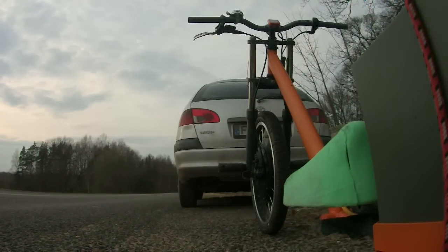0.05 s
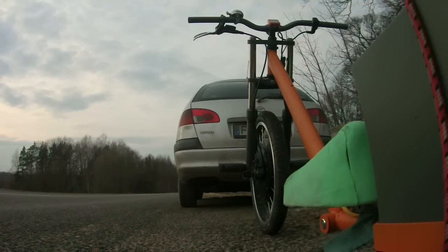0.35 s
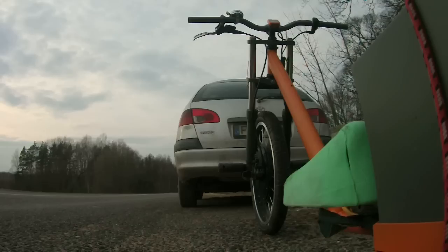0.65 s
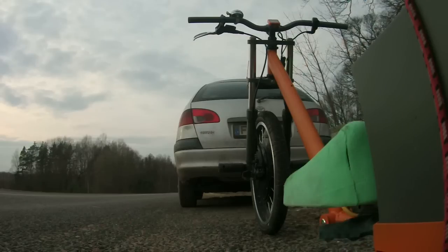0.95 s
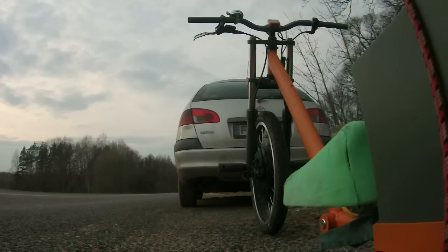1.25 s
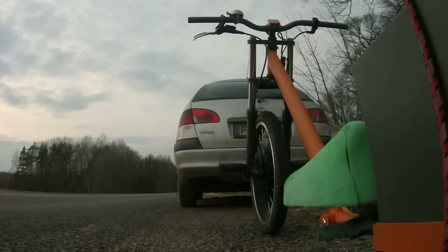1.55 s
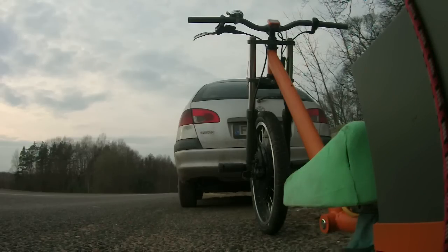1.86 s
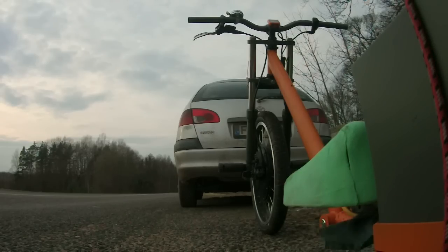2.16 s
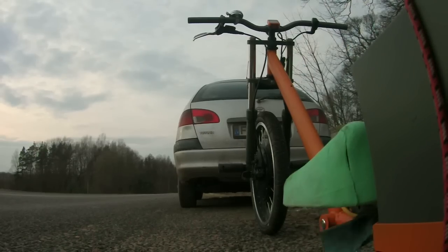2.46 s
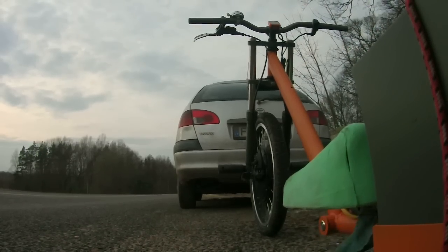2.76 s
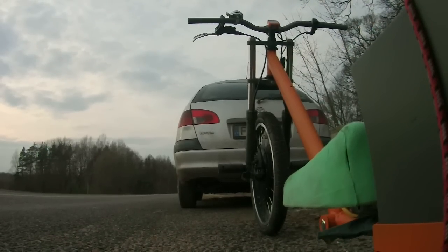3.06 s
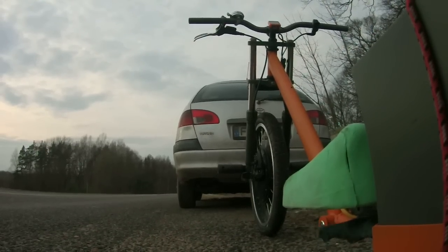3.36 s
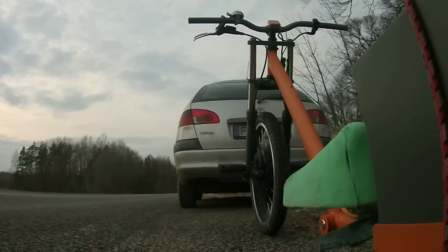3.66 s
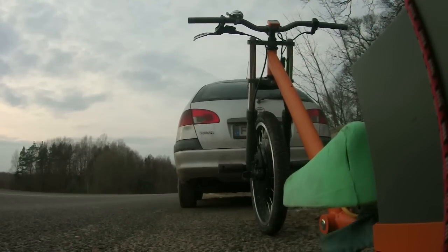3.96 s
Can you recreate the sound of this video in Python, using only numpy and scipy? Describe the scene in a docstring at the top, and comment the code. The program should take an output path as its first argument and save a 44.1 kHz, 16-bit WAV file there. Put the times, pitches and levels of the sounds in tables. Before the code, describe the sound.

A parked bicycle knocks and clatters as it is handled close by outdoors. For two seconds there is only a faint rumble, a low wavering hum and a few soft bumps. Two hollow knocks shake the frame at about 2.1 and 2.3 seconds. Small parts click and rub, and a sharp snap rings briefly near 2.9. More clicks and thumps follow, ending in a dull clunk around 3.7.

```python
"""On an open road, a parked bicycle rig is handled close by.
Two hollow knocks, each a cluster of quick blows, shake its frame. Small hard parts click and clatter
as they meet, and one sharp snap leaves a metal piece ringing. In between, soft bumps sway the rig
and shifting parts rub. Behind it all lie a low rumble, a wavering hum and faint distant noise."""
import sys
import numpy as np
from scipy import signal
from scipy.fft import rfft, irfft
from scipy.io import wavfile
from scipy.ndimage import uniform_filter1d

SR = 44100
rng = np.random.default_rng(int(sys.argv[2]) if len(sys.argv) > 2 else 0)


def to_wav(s):
    """Save 16-bit WAV."""
    ch = np.atleast_2d(s).T  # columns
    pcm = np.round(np.clip(ch, -1, 1) * 32767)  # PCM
    wavfile.write(sys.argv[1], SR, pcm.astype(np.int16))


N = 176400
T = np.arange(N) / SR

# Levels compare the rows of one table. A "colour" says how strong the low and high pitches are.
# colours of the steady hiss, the dull shuffling wash and the rumble: (pitch [Hz], level [dB])
HISS_COLOUR = [(90, 1.5), (290, -4.5), (480, -9.5), (700, -18), (1200, -12.5), (2000, -21.5), (3500, -27.5),
               (8000, -24.5), (10000, -27.5), (15000, -30)]
DULL_COLOUR = [(120, 1), (290, -8), (500, -9), (650, -19), (900, -20), (1200, -9), (1700, -17), (2300, -28),
               (5000, -44)]
DEEP_COLOUR = [(20, 2), (45, -10.5), (57, 1.5), (75, -15), (200, -39)]
# how the wash, the rumble and the hum rise and fall: (time [s], level [dB])
WASH_LEVELS = [(0, -63.5), (.3, -77), (.55, -61.5), (.72, -79), (.87, -67), (1.0, -57.5), (1.15, -61.5),
               (1.4, -58.5), (2.0, -62), (4, -79.5)]
RUMBLE_LEVELS = [(0, -47), (.72, -51.5), (1.05, -44), (2.02, -43), (2.6, -36), (3.7, -37), (3.85, -46.5)]
HUM_LEVELS = [(0, -53.5), (.55, -45), (.66, -60), (.95, -52.5), (1.1, -43), (1.9, -45), (2.02, -68)]

# rubbing as the parts are shifted: (time [s], level [dB])
RUB_LEVELS = [(2.19, -62), (2.27, -39), (2.36, -42), (2.38, -54), (2.41, -39.5), (2.45, -62), (2.49, -42.5),
              (2.52, -51.5), (2.63, -45.5), (2.72, -57.5), (2.85, -58), (2.93, -39.5), (2.97, -50.5),
              (3.045, -65.5), (3.075, -56.5), (3.23, -47.5), (3.295, -56.5), (3.39, -47.5), (3.44, -61),
              (3.53, -75.5), (3.65, -41), (3.70, -42.5), (3.735, -61.5), (4, -78.5)]
# hissing scuffs and gritty scrapes: (peak time [s], level [dB], half-width [s])
SCUFF_SWELLS = [(2.404, -52, 0.0096), (2.629, -54, 0.0098), (2.907, -33, 0.002), (3.33, -57.5, 0.0039),
                (3.404, -47.5, 0.0055), (3.654, -31.5, 0.0022)]
SCRAPE_SWELLS = [(.865, -61, 0.018), (1.42, -66, 0.012), (1.53, -63.5, 0.017), (1.70, -54.5, 0.013)]
# colours of the rubbing and the scuffs: (pitch [Hz], level [dB])
RUBBING_COLOUR = [(150, 5.5), (350, 0), (500, 1.5), (620, -9), (880, -10), (1200, -1), (2100, -6.5),
                  (2850, -19.5), (3800, -17), (5500, -30.5), (7400, -23), (9000, -30.5), (14000, -39)]
BRIGHT_COLOUR = [(1000, 1.5), (3500, 6.5), (11000, -6), (15000, -19.5)]
# soft bumps that sway the rig: (time [s], level [dB], pitch [Hz], ring time [s], rise time [s])
SOFT_BUMPS = [(0.979, -41.5, 149.5, 0.11, 0.0043), (0.997, -26.5, 33.3, 0.27, 0.004),
              (1.331, -29.5, 50, 0.12, 0.0032), (2.066, -38, 280, 0.068, 0.001),
              (2.093, -16.5, 272, 0.038, 0.0026), (2.108, -17, 52.8, 0.41, 0.0013),
              (2.266, -13.5, 62.3, 0.3, 0.0024), (2.477, -26, 255, 0.02, 0.0021),
              (2.477, -24.5, 255, 0.02, 0.0014), (2.6453, -13, 41.7, 0.1, 0.00057),
              (2.683, -9.5, 129, 0.032, 0.0011), (3.378, -17, 51.1, 0.13, 0.00092),
              (3.4082, -3, 44.2, 0.04, 0.0013), (3.41, -12, 164, 0.013, 0.0011),
              (3.637, -10.5, 23.3, 0.17, 0.0085), (3.671, -14.5, 239, 0.015, 0.00045),
              (3.698, -9.5, 44, 0.2, 0.0019)]

# small parts meeting: (time [s], level [dB], contact fade [s], thud [dB], brightness [dB])
PART_CLICKS = [(0.7068, -55.5, 0.0004, -7, 2), (2.296, -36, 0.0063, -12, -13.5),
               (2.572, -38, 0.0029, -20, -22), (2.616, -36, .0013, 2.5, -3), (2.6395, -25, 0.002, -4, -3),
               (2.6448, -21, 0.00084, -12, -19), (2.6513, -30.5, 0.0026, 5, -7),
               (2.683, -17.5, 0.0015, 0, -14.5), (2.847, -30.5, 0.0026, -10, -16),
               (2.8916, -37, 0.0048, 1.5, -8), (2.9079, -31, 0.0041, -32, -15),
               (2.938, -25.5, 0.0035, 2.5, -9.5), (3.323, -36.5, 0.00091, -11, -32),
               (3.3775, -22.5, 0.0011, -6.5, -20.5), (3.382, -30.5, 0.0019, -3, -23),
               (3.4049, -22, 0.0011, 0.5, -11), (3.515, -51.5, 0.00087, -22, -33),
               (3.643, -39.5, 0.0025, 1, -2), (3.655, -21, 0.00025, -20, -11),
               (3.673, -18.5, 0.0033, -5, -9.5), (3.680, -24, 0.0026, -1.5, -18.5)]
# knocks on the frame: (time [s], level [dB], contact fade [s], boom [dB], treble limit [Hz])
FRAME_KNOCKS = [(1.003, -53, 0.0045, -8, 4050), (1.036, -53.5, 0.0051, 5, 5500),
                (2.021, -50, 0.0029, 1.5, 1270), (2.0873, -33.5, 0.0066, -18, 4260),
                (2.0928, -12.5, 0.00049, -17, 3260), (2.099, -27, 0.02, 2.5, 2640),
                (2.186, -44.5, 0.0023, -4, 3970), (2.223, -29.5, 0.0015, -3, 3540),
                (2.2387, -27.5, 0.00082, 3, 2680), (2.2502, -9, 0.0055, -0.5, 4500),
                (2.255, -13.5, 0.00067, -1.5, 4570), (2.261, -35.5, 0.0029, 19, 7000),
                (2.4764, -29.5, 0.0031, -18, 5950), (2.987, -42, 0.003, -11, 1700)]
# clean, hard blows: (time [s], level [dB])
CLUNK_BLOWS = [(3.6992, -25.5)]  # a part settles into its seat
SNAP_BLOWS = [(2.9462, 4.5), (2.9473, -3.5)]  # the snap and its quick rebound
METAL_BLOWS = [(2.9465, -35.5), (3.673, -43)]  # these reach the metal piece
TAIL_BLOWS = [(2.0926, -26), (2.2502, -42.5)]  # these leave the frame ringing on

# A "mode" is a tone that a struck thing rings with. It fades by 60 dB in its ring time.
# modes of each thing: (pitch [Hz], level [dB], ring time [s])
PART_MODES = [(840, -8, 0.023), (1151, 12, 0.006), (1500, 1.5, 0.01), (2050, 7.5, 0.0041),
              (2540, 1, 0.0069), (3360, 1.5, 0.009)]  # small hard parts
EDGE_MODES = [(6760, -5.5, 0.00057), (6720, -0.5, 0.0022), (8150, 4.5, 0.00072), (11870, -9.5, .002)]  # the bright edge of a click or knock
SEAT_MODES = [(437, 3, 0.011), (1135, -6.5, 0.061), (1226, 4, 0.024)]  # the part that settles
SNAPPING_MODES = [(302, -11.5, 0.03), (1180, -12, 0.019), (1660, 2, 0.0075), (2346, 5.5, 0.01),
                  (3200, 5, 0.011), (3670, -11, 0.017), (3990, -32.5, 0.063), (6590, -8, 0.0055),
                  (9900, -10, .003), (11100, -11, 0.0028)]  # the part that snaps
METAL_MODES = [(1733, 0, .16), (1879, -19, .45), (2584, -14, .16), (2848, -21, .42), (4269, -9, .16),
               (4576, -33, .5), (9157, -29, .13)]  # the ringing metal piece
FRAME_MODES = [(804, -9, 0.066), (1158, 4.5, 0.044), (1472, 16.5, 0.01), (1870, -5, 0.029),
               (2073, 10.5, 0.018), (2550, -8, 0.024), (3240, 7, 0.0096), (3890, -3.5, 0.03),
               (4350, -17.5, 0.083), (5190, -5, 0.0062)]  # the hollow frame
BOOM_MODES = [(362, -28, 0.032), (410, -13.5, 0.058), (508.2, -21, 0.16)]  # its low boom
TAIL_MODES = [(1198, -11.5, 0.12), (1678, -0.5, .1), (2070, -6, 0.069)]  # its slower-fading tones


def from_db(db):
    """Turn decibels into a number to multiply by."""
    return 10 ** (np.asarray(db) / 20)


def rms_one(x):
    """Scale a sound so that its average strength (rms) is 1."""
    return x / np.sqrt(np.mean(x ** 2) + 1e-20)


def peak_one(x):
    """Scale a sound so that its loudest 1.5 ms has strength 1."""
    return x / np.sqrt(uniform_filter1d(x * x, 66).max())


def level(rows):
    """Join (time, level) points into a volume curve, silent until just before the first."""
    s, db = np.transpose(rows)
    return from_db(np.interp(T, s, db)) * (T >= s[0] - .05)


def swells(rows):
    """A volume curve made of bell-shaped rises."""
    return sum(from_db(db) * np.exp(-.5 * ((T - s) / width) ** 2) for s, db, width in rows)


def add(out, s, x):
    """Mix a short sound in at time s."""
    start = int(s * SR)
    out[start:start + len(x)] += x[:N - start]


def lowpass(x, hz, order=4):
    """Cut the treble above hz."""
    return signal.sosfilt(signal.butter(order, hz, fs=SR, output="sos"), x)


def coloured(x, colour):
    """Give a sound a colour; pitches beyond the table's ends fall away steeply."""
    hz, db = np.transpose(colour)
    f = np.maximum(np.arange(N // 2 + 1) * SR / N, 1)
    shape = from_db(np.interp(np.log(f), np.log(hz), db))
    ends = 1 / np.sqrt((1 + (hz[0] * .8 / f) ** 8) * (1 + (f / hz[-1] / 1.2) ** 8))
    return rms_one(irfft(rfft(x) * ends * shape, N))


def grit(per_s, spread_db=3):
    """Tiny slips of uneven size at random moments."""
    sizes = rng.choice([-1, 1], N) * from_db(spread_db * np.minimum(rng.exponential(1, N), 3))
    return rms_one((rng.random(N) < per_s / SR) * sizes)


def flutter(x, depth_db, changes_per_s=35.04, splits_hz=(1700, 2600, 3200)):
    """Split a sound into four pitch bands that each swell and fade at random."""
    out, swings = 0, rng.standard_normal((4, 2000))
    lows = [signal.sosfiltfilt(signal.butter(3, hz, fs=SR, output="sos"), x) for hz in splits_hz]
    bands = np.diff([0 * x, *lows, x], axis=0)
    for band, swing in zip(bands, swings):
        out += band * from_db(depth_db * np.interp(T * changes_per_s, np.arange(len(swing)), swing))
    return rms_one(out)


def ring(force, modes):
    """A force sets all the modes ringing, and each dies away at its own speed."""
    out = 0
    for hz, db, ring_s in modes:
        fade = np.exp(-np.log(1000) / (ring_s * SR))
        feedback = [1, -2 * fade * np.cos(2 * np.pi * hz / SR), fade * fade]
        out += from_db(db) * signal.lfilter([1, 0, -1], feedback, force + 1e-18) / 2
    return out


def contact(fade_s, size=6000):
    """The force of a rough contact: a first touch and a dying crackle, even across all pitches."""
    fade = np.exp(-T[:size] / fade_s)
    spectrum = rfft(rng.standard_normal(size) * fade + 3 * signal.unit_impulse(size))
    return irfft(spectrum / (np.abs(spectrum) + 1e-9), size) * np.sqrt(fade)


def struck(blows, modes, top_hz):
    """Clean, hard blows, each a single instant push, set the modes ringing."""
    force = np.zeros(N)
    for s, db in blows:
        add(force, s, from_db([db]))
    return lowpass(ring(force, modes), top_hz, order=2)


def outdoors(hiss_db=-65):
    """The background: a steady hiss, a dull grainy wash and a low rumble."""
    hiss, wash, rumble = rng.standard_normal((3, N))
    hiss = from_db(hiss_db) * coloured(hiss, HISS_COLOUR)
    wash = coloured(wash + grit(per_s=700), DULL_COLOUR)
    wash = level(WASH_LEVELS) * flutter(wash, depth_db=0.5)
    rumble = level(RUMBLE_LEVELS) * coloured(rumble, DEEP_COLOUR)
    return hiss + wash + rumble


def hum(hz=56.9, waver_hz=1.38, waver_db=2.5, wavers_per_s=7):
    """A low tone that wavers at random in pitch and level."""
    bend, swing = [np.interp(T * wavers_per_s, np.arange(400), points)
                   for points in rng.standard_normal((2, 400))]
    phase = 2 * np.pi * np.cumsum(hz + waver_hz * bend) / SR
    return level(HUM_LEVELS) * rms_one(from_db(waver_db * swing) * np.sin(phase))


def rubbing():
    """Shifting parts slip in many tiny steps, with a few bright scuffs and dull, gritty scrapes."""
    friction = 0.43 * grit(per_s=500) + .5 * rng.standard_normal(N)
    rub = level(RUB_LEVELS) * flutter(coloured(friction, RUBBING_COLOUR), depth_db=3)
    scuffs = swells(SCUFF_SWELLS) * coloured(friction, BRIGHT_COLOUR)
    scrapes = swells(SCRAPE_SWELLS) * coloured(grit(per_s=660), DULL_COLOUR)
    return rub + scuffs + scrapes


def bumps():
    """Each soft bump sways the rig, making a low tone that soon dies away."""
    out, t = np.zeros(N), T[:30000]
    for s, db, hz, ring_s, rise_s in SOFT_BUMPS:
        volume = from_db(db - 60 * t / ring_s) * (1 - np.exp(-t / rise_s))
        add(out, s, volume * np.sin(2 * np.pi * hz * t))
    return out


def clunk():
    """One last dull blow as a part settles into its seat."""
    return struck(CLUNK_BLOWS, SEAT_MODES, top_hz=2090)


def clicks(thud_hz=250, thud_ring_s=0.021, top_hz=7500, dulling=0.26):
    """Small parts meet: a dry tick, a thud under it and a bright edge. Each has its own brightness."""
    out = np.zeros(N)
    for s, db, fade_s, thud_db, bright_db in PART_CLICKS:
        force = contact(fade_s)
        tick = peak_one(lowpass(ring(force, PART_MODES), top_hz * from_db(dulling * bright_db)))
        thud = peak_one(lowpass(ring(force, [(thud_hz, 0, thud_ring_s)]), 2 * thud_hz, order=2))
        edge = peak_one(ring(force, EDGE_MODES))
        add(out, s, from_db(db - 3) * (tick + from_db(thud_db) * thud + from_db(bright_db) * edge))
    return out


def snap(crack_db=-13):
    """A sharp snap leaves a metal piece ringing; a later, softer blow rings it again."""
    crack = from_db(crack_db) * struck(SNAP_BLOWS, SNAPPING_MODES, top_hz=7000)
    return crack + struck(METAL_BLOWS, METAL_MODES, top_hz=12000)


def knocks(edge_db=-36, bass_cut_hz=820):
    """Blows make the hollow frame ring and boom, some duller, some brighter; the two loudest ring on."""
    out = np.zeros(N)
    boom = peak_one(lowpass(ring(signal.unit_impulse(6000), BOOM_MODES), 470, order=6))
    bass_cut = signal.butter(3, bass_cut_hz, "high", fs=SR, output="sos")
    for s, db, fade_s, boom_db, top_hz in FRAME_KNOCKS:
        force = contact(fade_s)
        frame = lowpass(ring(force, FRAME_MODES), top_hz, order=5)
        frame = peak_one(signal.sosfilt(bass_cut, frame))
        edge = peak_one(ring(force, EDGE_MODES))
        add(out, s, from_db(db - 5) * (frame + from_db(boom_db) * boom + from_db(edge_db) * edge))
    return out + struck(TAIL_BLOWS, TAIL_MODES, top_hz=6000)


def scene():
    """The handled rig and its open-air background, mixed into one channel."""
    rig = knocks() + snap() + clicks() + clunk() + bumps() + rubbing()
    return (rig + outdoors() + hum())[None]


def record(dry, top_hz=15500):
    """Round off the loudest peaks and cut the highest treble."""
    treble_cut = signal.ellip(8, .2, 70, top_hz, fs=SR, output="sos")
    return signal.sosfilt(treble_cut, np.tanh(dry))


dry = scene()
out = record(dry)
to_wav(out)
```